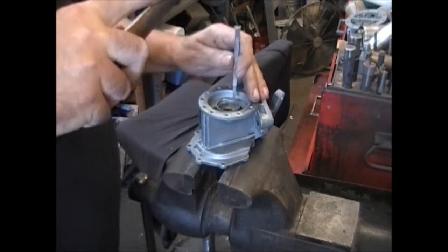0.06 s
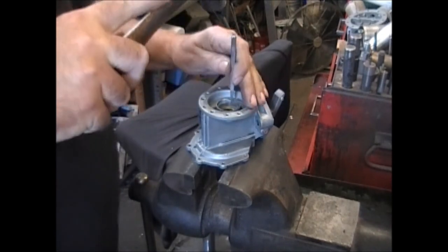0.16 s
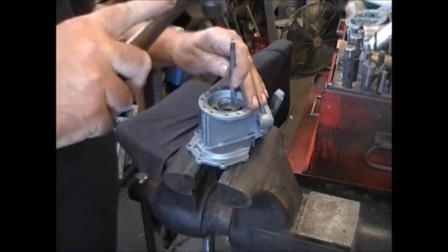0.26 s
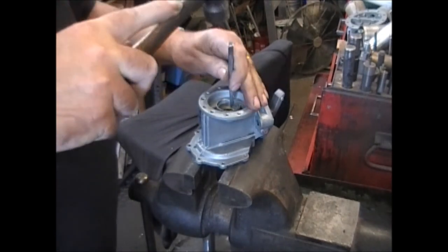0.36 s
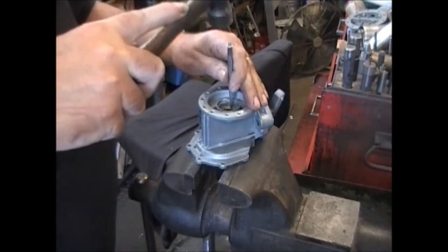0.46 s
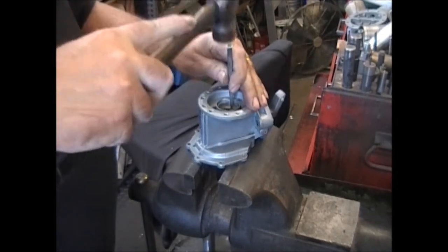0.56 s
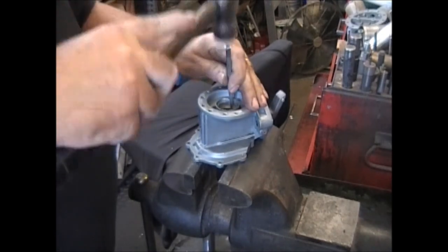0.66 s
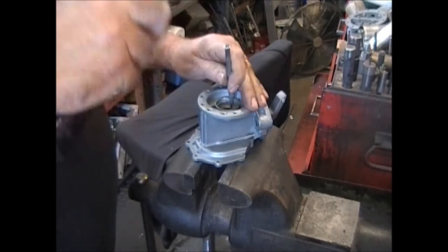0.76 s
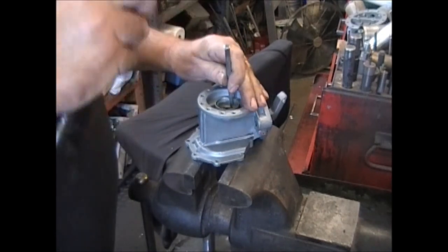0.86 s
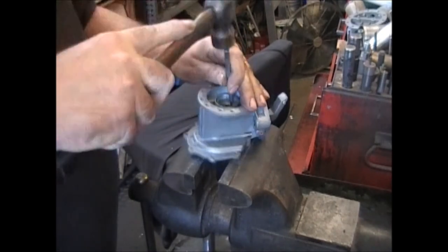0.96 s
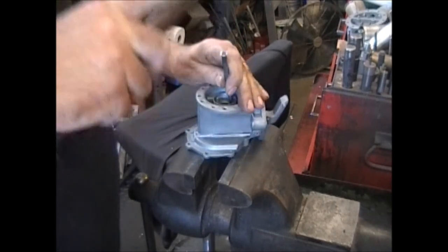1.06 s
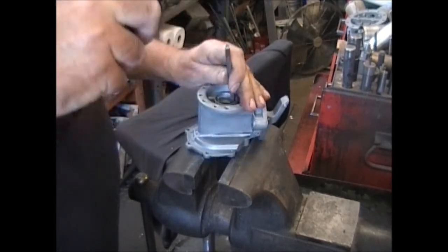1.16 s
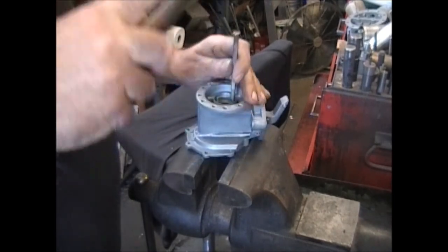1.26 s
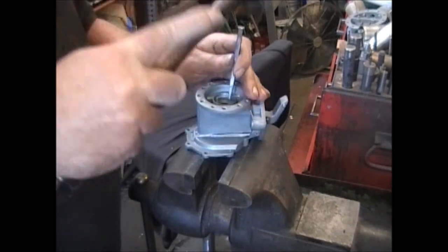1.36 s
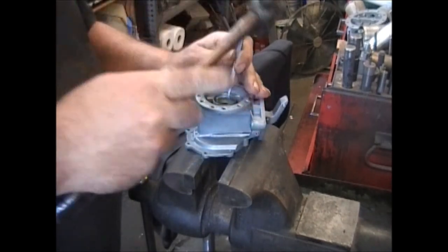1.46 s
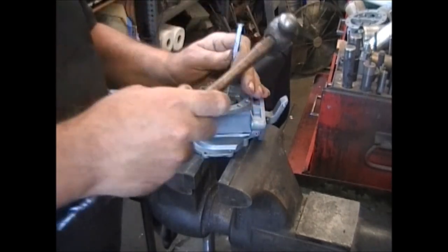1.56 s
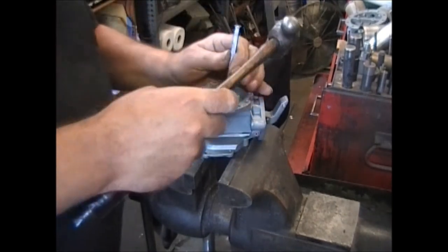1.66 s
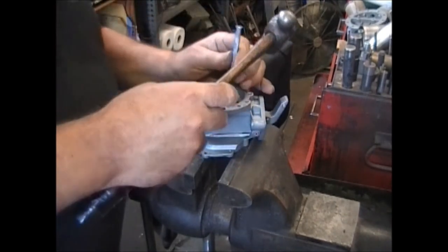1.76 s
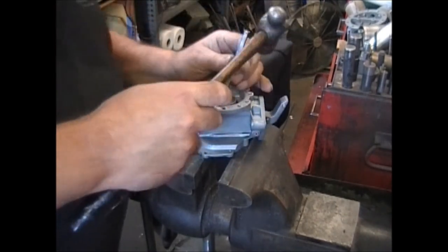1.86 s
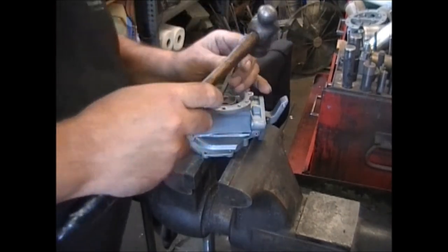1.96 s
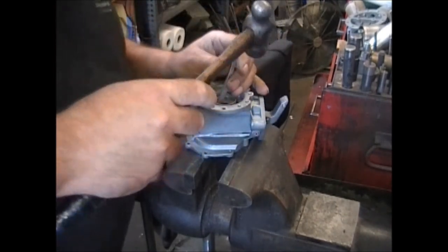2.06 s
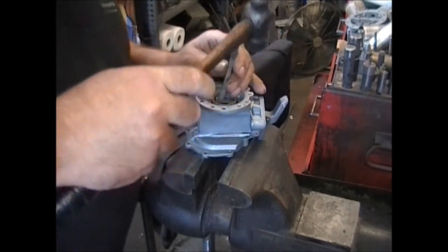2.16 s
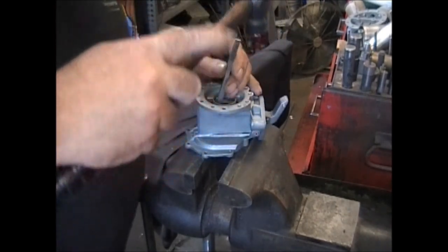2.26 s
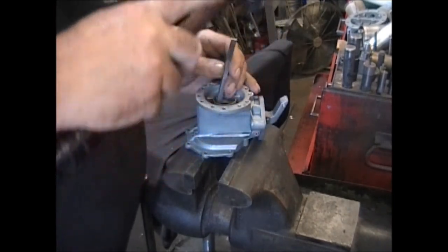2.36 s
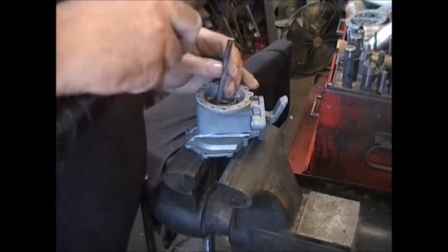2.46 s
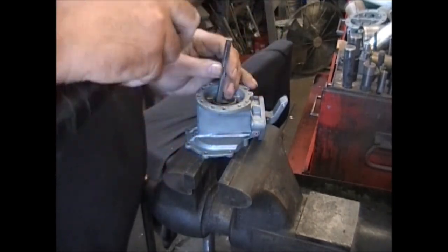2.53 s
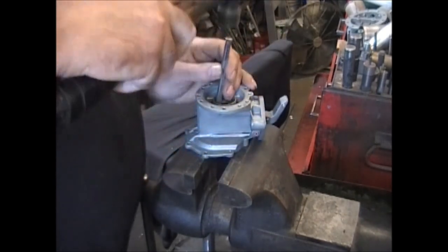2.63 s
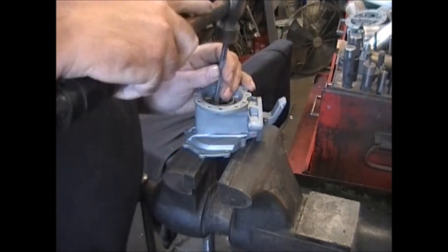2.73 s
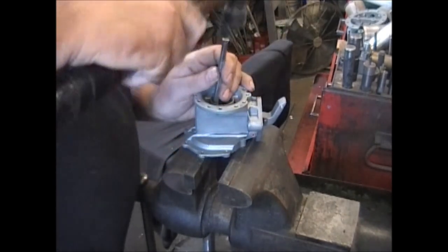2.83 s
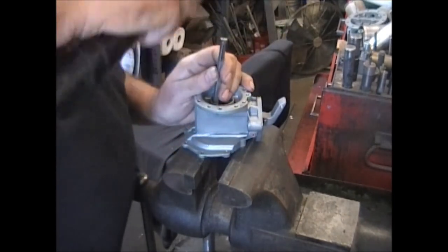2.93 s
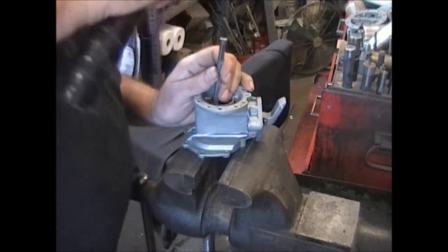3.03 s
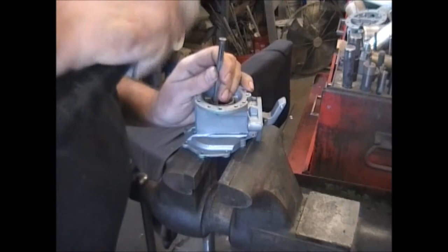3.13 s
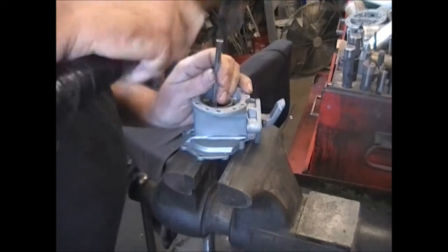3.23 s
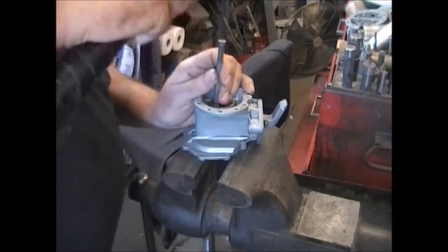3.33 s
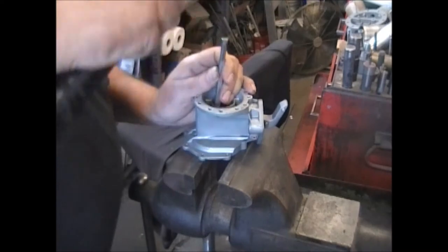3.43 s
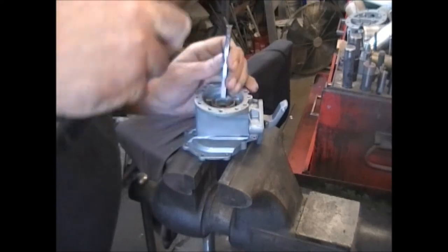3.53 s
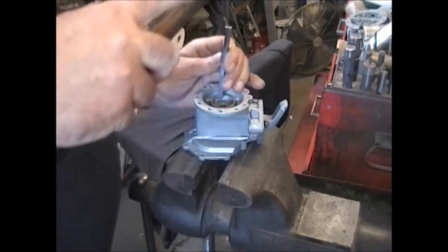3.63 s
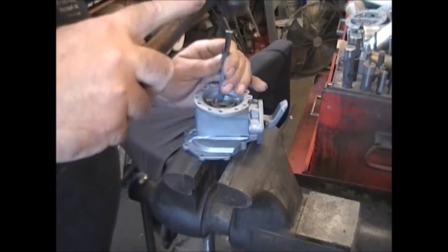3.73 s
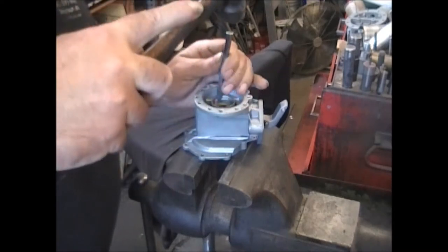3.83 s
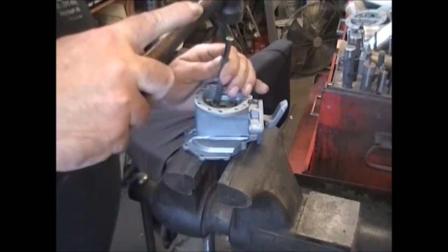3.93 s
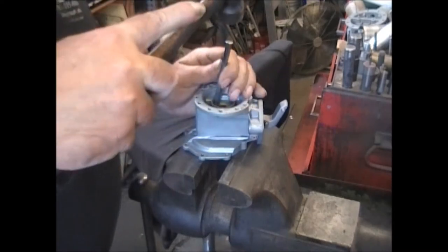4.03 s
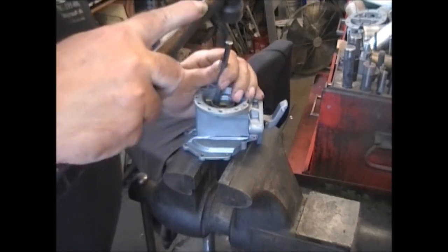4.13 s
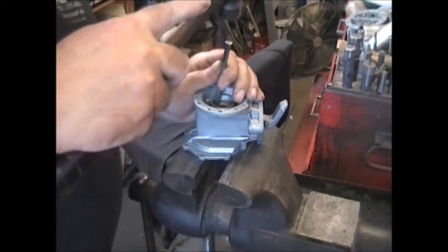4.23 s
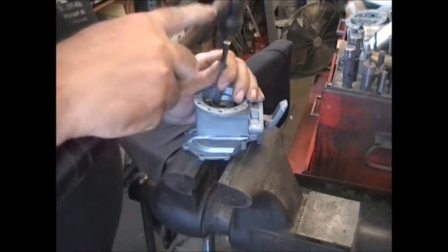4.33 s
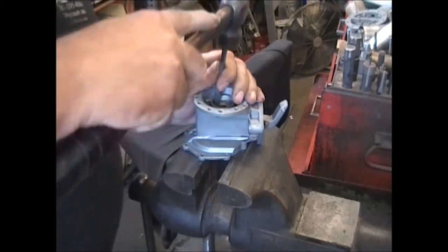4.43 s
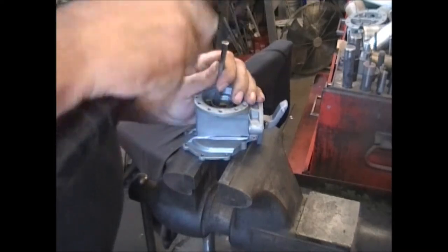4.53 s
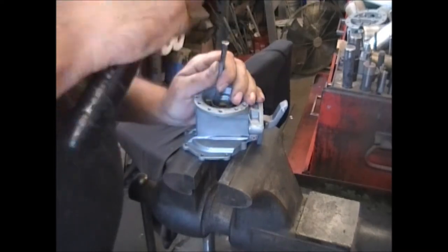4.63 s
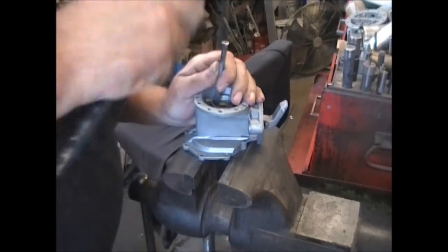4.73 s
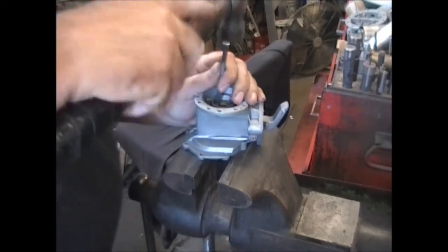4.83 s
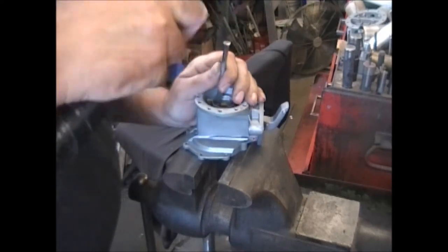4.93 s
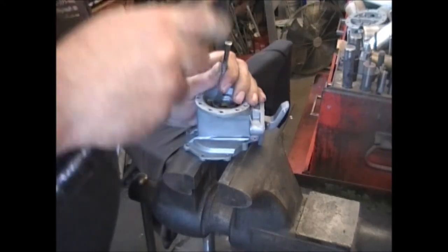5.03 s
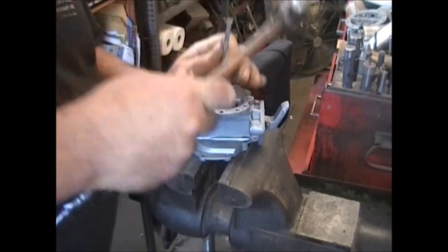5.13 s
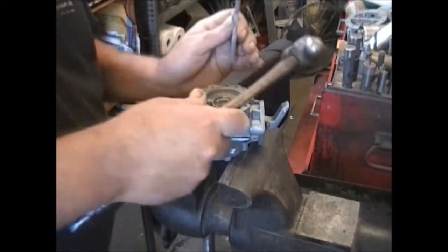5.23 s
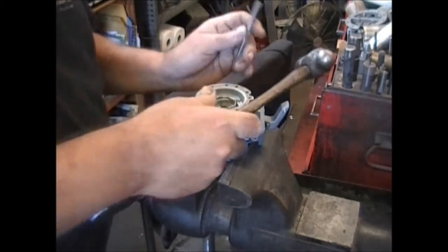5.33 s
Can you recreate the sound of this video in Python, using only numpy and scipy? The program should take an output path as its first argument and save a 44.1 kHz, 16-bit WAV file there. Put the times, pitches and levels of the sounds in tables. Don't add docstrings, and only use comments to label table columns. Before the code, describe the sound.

A hammer strikes a steel punch in three uneven pairs of sharp, ringing cracks on a clamped metal housing, over hissy workshop background.

```python
import sys
import numpy as np
from scipy import signal
from scipy.fft import rfft, irfft, next_fast_len
from scipy.io import wavfile

SR = 44100
rng = np.random.default_rng(int(sys.argv[2]) if len(sys.argv) > 2 else 0)


def voltage_ratio(decibels):
    exponent = np.asarray(decibels, float) / 20
    return 10 ** exponent


def pcm_store(signal):
    levels = np.round(np.clip(np.atleast_2d(signal), -1, 1) * 32767)
    wavfile.write(sys.argv[1], SR, levels.astype(np.int16).T)


N = 237561
OPPOSITE = np.array([[1], [-1]])

# hz, level_db (per Hz)
HISS_MID = [(25, -29), (60, -7), (110, -4), (200, -6), (400, -3.5), (700, -5), (1500, -8), (2200, -8.5),
            (4400, -10), (6300, -6), (7800, 0.5), (10500, -7.5), (14000, -13.5), (15800, -21.5)]
# hz, level_db (per Hz)
HISS_SIDE = [(18, -50.5), (30, -26.5), (106, -8), (345, -5), (599, -5.5), (720, -5.5), (1120, -8.5),
             (1220, -10), (4890, -20), (7250, -12.5), (8950, 0), (14000, -17), (16000, -33.5)]
# multiple of the buzz pitch, level_db (re hiss)
BUZZ = [(4, -13), (6, -8.5), (7, -19.5), (9, -12), (12, -11), (13, -15.5), (16, -6.5), (17, -28), (18, -3),
        (19, -10), (20, -19), (21, -9.5), (22, -6)]
# struck_s, pitch_hz, level_db (re hiss), swell_s, t60_s
SYMPATHETIC = [(0, 485.6, -4, 0.012, 5.2), (0, 526, -2.5, 0.0094, 5.7), (0, 347.7, -6.5, 0.02, 16),
               (1.05, 492, 8, .05, 4.6), (1.25, 534, 6, 0.047, 2.1), (1.2, 445, -6.5, 0.041, 3),
               (2.8, 673, 3, 0.032, 4), (3.25, 487, 12, 0.048, 2.27), (3.36, 666, 21.5, 0.042, 1.55),
               (3.5, 451, 3, 0.075, 3.5), (4.45, 676, 8.5, 0.0435, 4.3), (4.85, 484, 8.5, 0.047, 5.),
               (5.0, 532, 17, 0.047, 3.3), (5.05, 451, 2, .08, 4.4)]
# start_s, tick_db, knock_db, ring_db, ring_hz
TOUCHES = [(0.282, -47.5, -56.5, -53.5, 5840), (0.4397, -35.5, -44.5, -45.5, 7100),
           (0.4398, -60, -60.5, -47, 4900), (.4785, -44, -43.5, -42, 2800), (.486, -59.5, -43.5, -56, 2286),
           (.609, -52, -69, -41.5, 7400), (.6095, -58.5, -71.5, -43, 4060),
           (0.611, -59.5, -71.5, -50.5, 4900), (.7585, -51.5, -59.5, -48, 4070),
           (.94, -56.5, -58.5, -48.5, 4090), (1.19, -73, -72.5, -57, 5760), (1.3219, -50.5, -47, -45, 2710),
           (1.33, -65.5, -50.5, -47, 595), (2.2485, -33, -47, -40.5, 4940), (2.479, -61, -68, -49, 3950),
           (3.8646, -45, -63.5, -53, 5070), (3.877, -47, -52, -45.5, 9100),
           (3.878, -62, -73.5, -47.5, 5095), (3.877, -63.5, -68, -49, 7100), (3.99, -52.5, -54, -58, 4960),
           (4.059, -50.5, -72, -50, 6500), (4.137, -65, -50, -41.5, 640), (5.131, -65.5, -74, -47, 8370),
           (5.133, -68, -70, -52.5, 3280)]
# hz, level_db (per Hz)
TICK = [(500, -17), (1500, -4), (3000, -2), (5000, -5.5), (7000, -0.5), (9000, -3.5), (11000, -12),
        (14000, -26.5)]
# hz, level_db (per Hz)
KNOCK = [(100, -31), (300, -8.5), (600, 4.5), (800, -2), (1150, -2), (1800, -12.5), (3000, -32)]
# start_s, crack_db, thud_db (re crack), thud_peak_hz, ring_db
BLOWS = [
    (0.6551, -11, -6.5, 674, -7),
    (0.989, 5, -22, 794, -3),
    (2.719, -5, -15, 700, -3.5),
    (3.1934, 4.5, -14, 2000, 2.5),
    (4.4081, -1.5, -15.5, 1603, -5.5),
    (4.8046, 5.5, -15, 1430, 3.5),
]
# hz, level_db (per Hz)
CRACK = [(880, -30), (1500, -5), (2660, -10), (5760, -6.5), (8550, 2.5), (11200, -6.5), (12700, -12),
         (15000, -16.5), (16000, -21.5)]
# hz, level_db (per Hz)
THUD = [(120, -44.5), (200, -20.5), (400, -5.5), (750, -10), (1200, -3.5), (2500, -17), (3250, -44),
        (5500, -120)]
# hz, level_db (per Hz)
RATTLE = [(880, -36), (1500, -12.5), (2360, -17.5), (2770, -2), (5220, -14), (7230, -1.5), (8720, -11.5),
          (13000, -21), (14400, -33.5), (16000, -74)]
MODE_HZ = [1065, 1260, 1360, 1600, 1690, 2175, 2657, 2802, 3095, 3350, 3450, 3750, 3903, 4845, 4953, 5560,
           5650, 6180, 6620, 6945, 7005, 7150, 7400, 7545, 7622, 8100, 8320, 8820, 9340, 9600]
MODE_T60_S = [0.13, 0.17, 0.12, 0.19, .25, 0.093, .22, 0.12, 0.11, .15, .14, 0.18, 0.11, .2, 0.11, 0.16,
              .15, 0.13, 0.18, 0.16, 0.15, 0.13, 0.13, 0.15, .15, 0.094, .15, 0.12, 0.14, 0.14]
MODE_DB = [-30, -35, -30, -38.5, -42.5, -39.5, -38, -32.5, -39.5, -39.5, -39, -33.5, -33, -37.5, -35.5,
           -32.5, -33, -36, -31.5, -29.5, -23, -30, -22.5, -23.5, -28, -29.5, -34, -33, -36, -40]
# pitch_hz, one row a blow
FAVOURED_HZ = [(1065, 7150, 7545, 7622), (2802, 3903, 7150, 7400), (4953, 6620, 7005, 7622, 8100),
               (2175, 7005, 8100, 9340), (1600, 1690, 7400, 8100, 8320), (2657, 3350, 3903, 6620, 7545)]
# lift_db, one row a blow
FAVOURED_DB = [(10, 18, 15, 14), (21, 16, 22, 15), (9.4, 9, 7, 10, 19), (6.4, 9.3, 14, 8),
               (10, 12, 8.5, 13, 14), (4.5, 10, 11, 6, 5)]
# [pitch_hz, level_db, t60_s]
SINGING = [
    (0.9881, [(2650, -53.5, .6), (2823, -52.5, .5), (3930, -49, .6), (5560, -59, 1.6)]),
    (3.1919, [(3880, -51, .8), (3700, -62, 3.), (9340, -51.5, .6)]),
    (4.4086, [(1600, -47, .5), (1702, -47, .5), (1780, -51, .5)]),
    (4.8042, [(2657, -48.5, .7), (3360, -50, .5), (3895, -59, 1.1)]),
]
# start_s, level_db, thud_db (re level), t60_s, ring_db (re the blow's)
BOUNCES = [
    (0.9938, -15, -7.5, .03, -2),
    (2.7267, -27, -17, 0.023, 5.5),
    (3.2246, -15.5, -18.5, 0.037, 0),
    (3.2314, -20.5, -13.5, 0.038, -5),
    (3.249, -27, -11.5, 0.068, -9.5),
    (4.4154, -17, -7, 0.015, 4.5),
    (4.8318, -24, -8.5, .05, -7.5),
    (4.8375, -20.5, -13.5, 0.029, -8.5),
    (4.851, -21.5, -13.5, 0.041, -2.5),
]
# hz, side_db (re mid)
WIDE = [(200, -19), (1500, -11), (4500, -10.5), (7000, -11.5), (8000, -1.5), (9000, 1.5), (12000, -3)]
# band_hz, level_db, t60_s
SHOP = [(200, -24, 1), (403, -24, .8), (805, -24, 0.64), (1490, -30.5, 0.82), (2800, -32, 0.67),
        (4930, -32.5, 0.57), (8000, -35, 0.13), (12000, -51, .25)]


def shape(x, table):
    hz, db = np.transpose(table)
    size = next_fast_len(x.shape[-1])
    bins_hz = np.fft.rfftfreq(size, 1 / SR)
    gain = voltage_ratio(np.interp(np.log(bins_hz + 1), np.log(hz), db))
    filtered = irfft(rfft(x, size) * gain, size)[..., :x.shape[-1]]
    return filtered, np.sqrt(np.mean(gain ** 2))


def colour(x, table, rms_db=0):
    shaped, gain = shape(x, table)
    return shaped * voltage_ratio(rms_db) / gain


def fade(t, t60_s):
    return np.exp(-np.log(1000) * t / t60_s)


def microphone_hiss():
    mid = colour(rng.standard_normal(N), HISS_MID, rms_db=7)
    side = colour(rng.standard_normal(N), HISS_SIDE, rms_db=6)
    return mid + side * OPPOSITE


def mains_buzz():
    t = np.arange(N) / SR
    buzz_hz = 120.02
    buzz = np.zeros(N)
    for multiple, db in BUZZ:
        buzz += voltage_ratio(db) * np.sin(2 * np.pi * (multiple * buzz_hz * t + 0.2 * rng.random()))
    return buzz


def sympathetic_ringing():
    t = np.arange(N) / SR
    tubes = np.zeros(N)
    for struck_s, hz, db, swell_s, t60_s in SYMPATHETIC:
        age = np.maximum(t - struck_s, 0)
        envelope = (1 - np.exp(-age / swell_s)) * fade(age, t60_s)
        tubes += voltage_ratio(db) * envelope * np.sin(2 * np.pi * hz * age)
    return tubes


def gain_control():
    open_hiss_db, bite_db, react_s = -53.5, -17.5, 0.19
    grip, let_go = 1.9, 2.475
    earlier_blow = (-0.24, -0.5)
    load = 1
    for s, db in [earlier_blow] + [blow[:2] for blow in BLOWS]:
        age = np.maximum(np.arange(N) / SR - s, 0) / react_s
        load = load + voltage_ratio(db - bite_db) ** 2 * age ** grip / (1 + age ** (grip + let_go))
    return voltage_ratio(open_hiss_db) / np.sqrt(load)


def add(out, at, x):
    out[at:at + len(x)] += x[:len(out) - at]


def contact(s, db, thud_db, t60_s, modes, bright, dull, rise_s=0.00051, hold_s=0., waver_db=3.0,
            thud_longer=1.65):
    t = np.arange(SR // 2) / SR
    noise = rng.standard_normal((2, len(t)))
    after = np.maximum(t - hold_s, 0)
    sound = colour(noise[0], bright, db) * fade(after, t60_s)
    sound = sound + colour(noise[1], dull, thud_db) * fade(after, thud_longer * t60_s)
    for hz, mode_db, decay_s in modes:
        loose = signal.resample(rng.standard_normal((2, 40)), len(t), axis=1)
        phase = 2 * np.pi * (hz * t + rng.random()) + 0.12 * loose[1]
        decay = fade(t, decay_s) + voltage_ratio(-27) * fade(t, 4.5 * decay_s)
        sound = sound + voltage_ratio(mode_db + waver_db * loose[0]) * np.sin(phase) * decay
    return int(s * SR), (1 - np.exp(-t / rise_s)) * sound


def light_touches(out):
    for s, db, knock_db, ring_db, hz in TOUCHES:
        modes = [(hz, ring_db, .05)]
        add(out, *contact(s, db, knock_db, 0.047, modes, TICK, KNOCK, waver_db=1.0, thud_longer=3.8))


def thud_spectrum(peak_hz):
    table_hz, table_db = np.transpose(THUD)
    hz = np.geomspace(table_hz[0], table_hz[-1], 60)
    base_db = np.interp(np.log(hz), np.log(table_hz), table_db)
    octaves = np.log2(hz / peak_hz)
    peak_db = 11 * np.exp(-(octaves / 0.22) ** 2 / 2)
    return np.transpose([hz, base_db + peak_db])


def mode_levels(blow):
    lift = dict(zip(FAVOURED_HZ[blow], FAVOURED_DB[blow]))
    ring_db = BLOWS[blow][4]
    return np.array([ring_db + db + lift.get(hz, 0) for hz, db in zip(MODE_HZ, MODE_DB)])


def hammer_blows(out):
    for blow, (s, db, thud_db, peak_hz, _) in enumerate(BLOWS):
        dull = thud_spectrum(peak_hz)
        modes = zip(MODE_HZ, mode_levels(blow), 0.66 * np.array(MODE_T60_S))
        add(out, *contact(s, db, db + thud_db, 0.0092, modes, CRACK, dull, rise_s=.0001, hold_s=0.0017))
        rattle_db = -22 + 1.13 * db
        add(out, *contact(s, rattle_db, rattle_db + thud_db + 13.0, .12, [], RATTLE, dull, rise_s=0.0014))


def singing_housing(out):
    for s, modes in SINGING:
        add(out, *contact(s, -90, -90, 0.0092, modes, CRACK, KNOCK, rise_s=.01, waver_db=2.5))


def punch_bounces(out):
    starts = [blow[0] for blow in BLOWS]
    for s, db, thud_db, t60_s, ring_db in BOUNCES:
        blow = np.searchsorted(starts, s) - 1
        modes = zip(MODE_HZ, mode_levels(blow) + ring_db, 0.21 * np.array(MODE_T60_S))
        add(out, *contact(s, db, db + thud_db, t60_s, modes, RATTLE, thud_spectrum(BLOWS[blow][3])))


def microphone_ports(x, scatter_t60_s=0.0072, scatter_db=-12.5, side_db=-3.5):
    t = np.arange(1024) / SR
    envelope = fade(t, scatter_t60_s)
    scatter = shape(rng.standard_normal(len(t)), WIDE)[0] * envelope
    scattered = signal.fftconvolve(x, scatter / np.sqrt(np.sum(envelope ** 2)))[:N]
    turned = signal.hilbert(shape(x, WIDE)[0], next_fast_len(N)).imag[:N]
    return x + (voltage_ratio(side_db) * turned + voltage_ratio(scatter_db) * scattered) * OPPOSITE


def workshop_echo(x, side_db=-1.0):
    t = np.arange(SR) / SR
    tail = 0
    for hz, db, t60_s in SHOP:
        edges_hz = [hz / 1.34, min(hz * 1.46, .45 * SR)]
        band = signal.butter(2, edges_hz, "bandpass", fs=SR, output="sos")
        noise = signal.sosfilt(band, rng.standard_normal((2, SR)))
        tail = tail + voltage_ratio(db) * noise * fade(t, t60_s)
    tail = np.array([tail[0], shape(tail[1], WIDE)[0]])
    tail = tail * (1 - np.exp(-t / 0.0025)) * voltage_ratio(-23.5)
    mid, side = signal.fftconvolve(x[None], tail, axes=1)[:, :N]
    return mid + voltage_ratio(side_db) * side * OPPOSITE


def scene():
    background = microphone_hiss() + mains_buzz() + sympathetic_ringing()
    work = np.zeros(N)
    light_touches(work)
    hammer_blows(work)
    singing_housing(work)
    punch_bounces(work)
    return microphone_ports(work) + workshop_echo(work) + gain_control() * background


def roll_off(x):
    return signal.sosfilt(signal.butter(12, 15750, fs=SR, output="sos"), x)


def record(dry):
    capsule = signal.butter(4, 17000., fs=SR, output="sos")
    dry = signal.sosfilt(capsule, dry)
    bias = 0.3 * OPPOSITE
    soft = 1.152 * (np.tanh(dry / 1.276 + bias) - np.tanh(bias))
    linear = 0.84 * dry
    bend_filter = signal.butter(2, 250., "highpass", fs=SR, output="sos")
    bend = signal.sosfilt(bend_filter, soft - linear)
    limited = np.clip(linear + bend, -1.05, 1.05)
    coupling = signal.butter(1, 150., "highpass", fs=SR, output="sos")
    return roll_off(signal.sosfilt(coupling, limited))


dry = scene()
out = record(dry)
pcm_store(out)
```